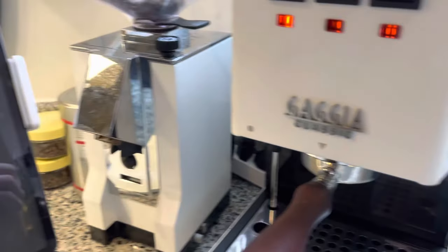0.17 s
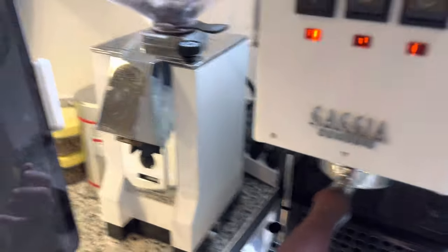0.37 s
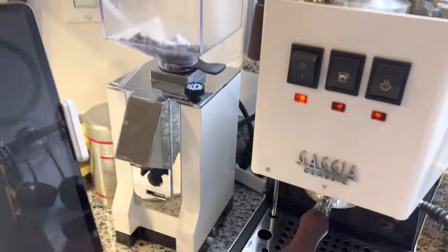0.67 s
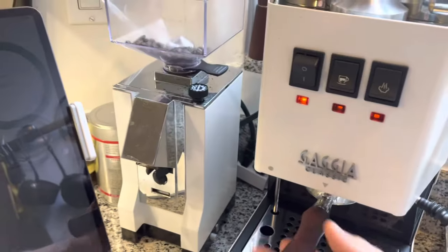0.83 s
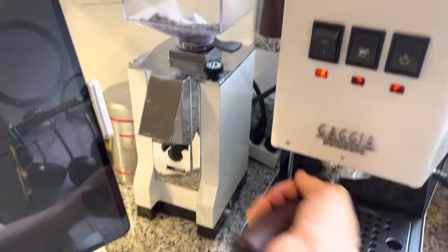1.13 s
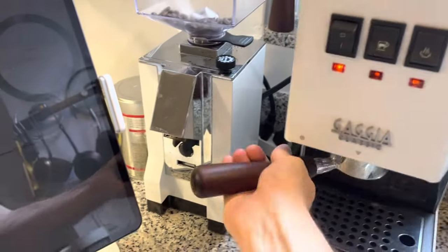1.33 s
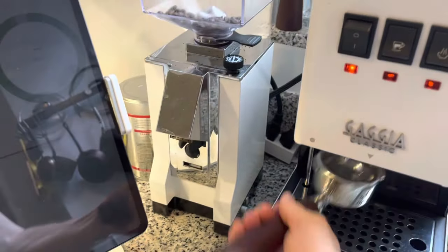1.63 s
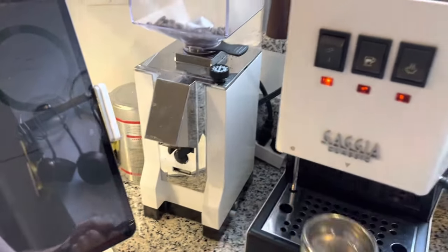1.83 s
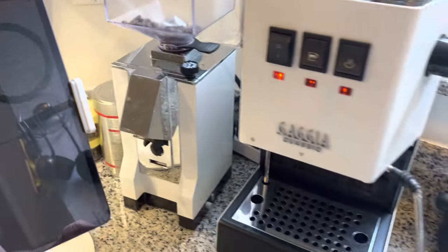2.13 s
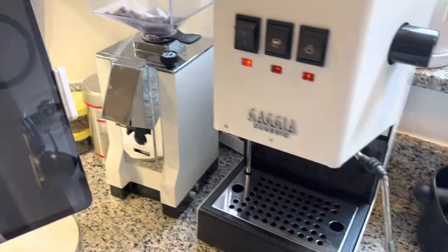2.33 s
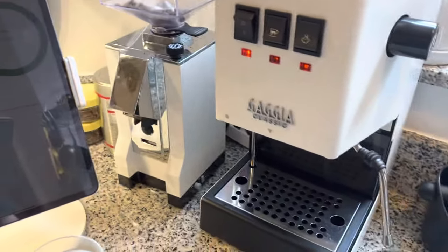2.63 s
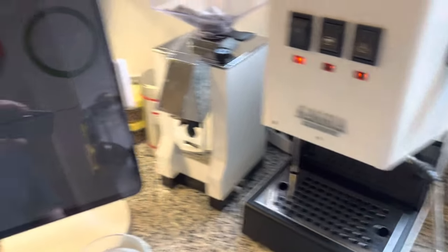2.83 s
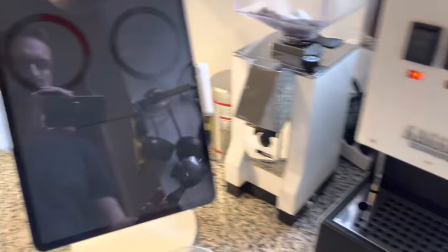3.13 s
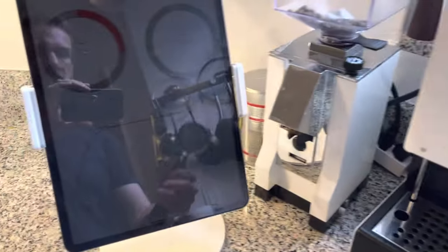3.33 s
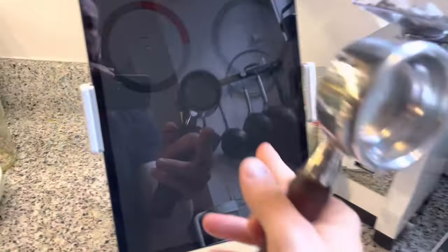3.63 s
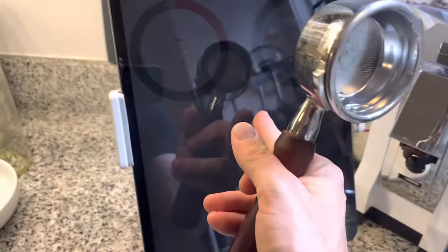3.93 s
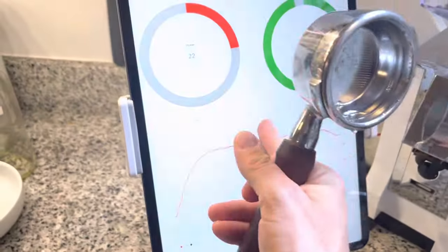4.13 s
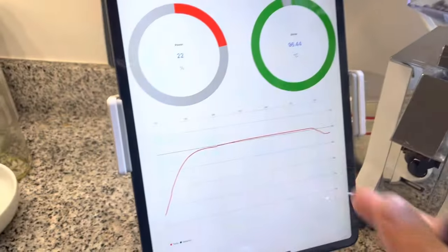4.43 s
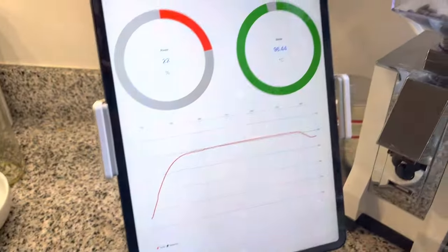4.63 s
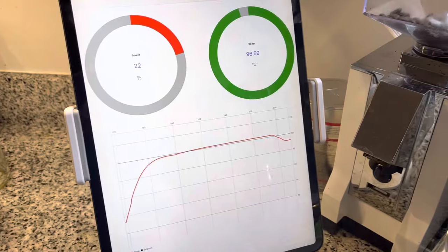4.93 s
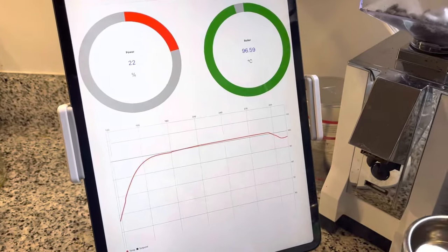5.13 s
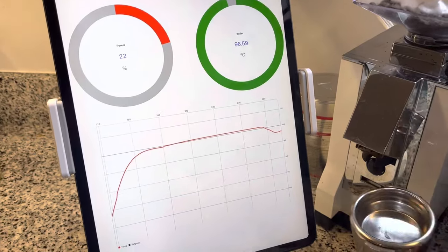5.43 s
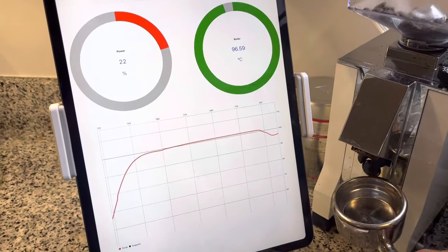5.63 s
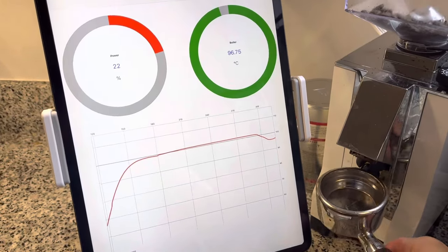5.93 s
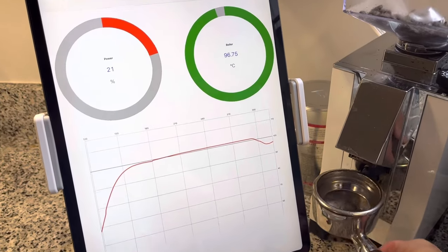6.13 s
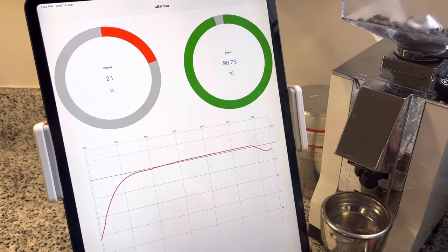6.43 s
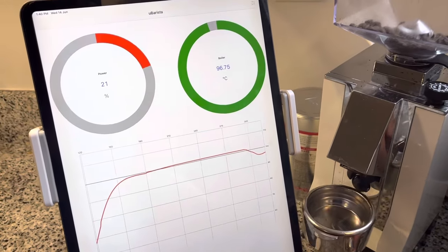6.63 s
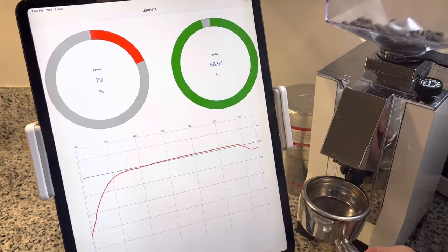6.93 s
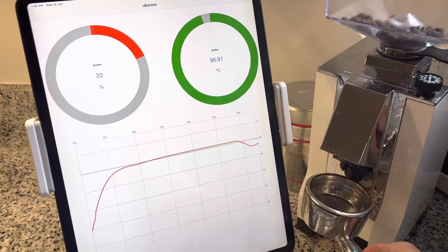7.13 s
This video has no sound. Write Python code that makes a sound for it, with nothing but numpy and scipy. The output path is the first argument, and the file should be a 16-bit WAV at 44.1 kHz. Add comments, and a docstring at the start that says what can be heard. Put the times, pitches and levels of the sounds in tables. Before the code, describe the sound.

Close handheld phone pickup in a small, slightly reverberant kitchen with a low hum. A metal filter holder twists out with a dry scrape, tiny squeaks and a burst of clunks. A cup knocks on the stone counter, faint metallic ticks and skin rubs follow, then the basket bangs into the grinder fork and rattles. A switch snaps and the grinder hums and crunches beans until the end.

```python
"""In a small kitchen, a steel portafilter is twisted out of an espresso machine and a cup is set on the counter.
Blows ring dense and clear modes of steel, counter and fork as the basket ticks, then clatters into a grinder.
Rubbing is coloured random clicks. A switch snaps, the motor hums in harmonics and the burrs crunch beans.
A phone with two ports, tapped by fingers, hears it over steady air noise and a low hum."""
import sys
import numpy as np
from scipy import signal
from scipy.fft import rfft, irfft
from scipy.io import wavfile
from scipy.ndimage import uniform_filter1d

SR = 44100
rng = np.random.default_rng(int(sys.argv[2]) if len(sys.argv) > 2 else 0)


def wrap_up_sound(samples):
    """Save the sound to the file named by the first command line argument, as 16-bit audio."""
    columns = np.atleast_2d(samples).T
    # keep every value between -1 and 1, then stretch to whole-number steps
    tamed = np.clip(columns, -1, 1)
    steps = np.round(tamed * 32767).astype(np.int16)
    wavfile.write(sys.argv[1], SR, steps)


N = 321489
TIME = np.arange(N) / SR  # s
BAND_HZ = 50 * 2 ** (np.arange(26) / 3)  # third-octave centres

# Blows. Brightness tilts the spectrum about 1 kHz; t60 is the decay time at 1 kHz.
# Lugs knock out of the group head. Each row: start in seconds, level in dB, brightness in dB per octave, t60 in s.
LUG_KNOCKS = [(1.317, -46, -3.5, 0.11), (1.327, -39, -6.5, 0.19), (1.3573, -26, 1, 0.068),
              (1.362, -27.5, -5.5, 0.074), (1.370, -26.5, -1.5, 0.091), (1.386, -31.5, 1, 0.06),
              (1.3955, -30.5, -0.5, 0.064), (1.404, -34.5, -1.5, 0.043)]
# The cup lands on the counter. Each row: start in seconds, level in dB, brightness in dB per octave, t60 in s.
COUNTER_KNOCKS = [(2.518, -40, 0, 0.22), (2.528, -30, -5.5, 0.23), (2.5625, -32.5, 2, 0.033),
                  (2.566, -33, 4.5, 0.066), (2.584, -37.5, -1.5, 0.35), (2.928, -42, -4, 0.18)]
# The rim grazes the grinder's spout. Each row: start in seconds, level in dB, brightness in dB per octave, t60 in s.
RIM_TOUCHES = [(5.9738, -36.5, -0.5, 0.063), (5.9875, -41.5, -0.5, 0.076)]
# The handle is bumped. Each row: start in seconds, level in dB, brightness in dB per octave, t60 in s.
HANDLE_BUMPS = [(1.636, -47, -14, .08), (5.8387, -42.5, 1, 0.06), (5.874, -42, -6, 0.11),
                (6.1211, -43.5, -8, 0.06)]
# The switch snaps. Each row: start in seconds, level in dB, brightness in dB per octave, t60 in s.
SWITCH_SNAPS = [(6.748, -29.5, 0.37, 0.046), (6.7535, -31.5, -0.55, 0.026)]
# Dull knocks of the basket against the fork, quiet to loud.
# Each row: start in seconds, level in dB, brightness in dB per octave.
FORK_KNOCKS = [(6.196, -44, 6.5), (6.2035, -31.5, 2.5), (6.207, -24.5, -3.5), (6.2605, -26, -1.5),
               (6.2705, -25.5, 4), (6.290, -15, -3.5)]
# The sticking rim jerks free. Each row: start in seconds, level in dB, brightness in dB per octave.
JERKS = [(1.089, -52, -2.5), (1.118, -57.5, 2), (1.149, -57, 0.5), (1.163, -52.5, -2.5), (1.249, -58, 4),
         (1.287, -53, -6)]
# Fingers tap the phone. Each row: start in seconds, level in dB, brightness in dB per octave.
PHONE_TAPS = [(.1116, -46.5, 2), (.1984, -50.5, 3.5), (.214, -48.5, 2), (.2245, -40, 3), (4.0532, -52.5, 8),
              (4.07, -55.5, 9.5)]
# The basket ticks in its holder; the one at 4.6046 s is a scuff on the phone.
# Each row: start in seconds, level in dB, brightness in dB per octave, favoured mode in Hz, ring in dB re the tick.
BASKET_TICKS = [(1.048, -64.5, 2, 4270, -10), (2.185, -64.5, -4.5, 2350, -7), (2.802, -68.5, -3, 2350, -1),
                (2.831, -69, -2.5, 2890, -1.5), (2.859, -69, -3.5, 2890, -5), (2.9243, -61, -4, 2890, -4),
                (2.986, -70, -3, 3215, 0), (3.0056, -65, -1, 2890, 1), (3.025, -70, -3, 2890, 0),
                (3.063, -72, -3, 2890, 0), (3.114, -63.5, -1.5, 3215, 2), (3.2838, -64.5, 1, 2350, 0),
                (3.367, -70, -5, 1850, -1), (3.544, -67, -3, 2350, -4), (3.573, -64, 2.5, 2350, -4),
                (3.6374, -58.5, 1, 2350, -1), (3.6767, -60, .5, 2350, -2.5), (4.4916, -66, 7.5, 2350, 11.5),
                (4.6046, -58.5, 6, 1850, 3), (4.628, -68, -3, 2890, 4), (4.7068, -66.5, -1.5, 1850, 3.5)]
# Beans crack and, brightest, clumps of grounds hit the chute.
# Each row: start in seconds, level in dB, brightness in dB per octave, favoured pitch in Hz.
BEAN_CRACKS = [(6.789, -42.5, 2.5, 2300), (6.801, -39, 2, 2150), (6.832, -38.5, 0.5, 2000),
               (6.844, -36.5, 1, 1430), (6.877, -42.5, 1, 2050), (6.899, -41.5, 1, 1460),
               (6.912, -45, 0, 2050), (6.934, -43.5, -1, 1450), (6.991, -35.5, -6, 2050),
               (6.999, -37.5, -3, 1400), (7.008, -43, -6, 2050), (7.046, -47, 5, 1440),
               (7.08, -46, -2, 1450), (7.162, -51, 7, 7000), (7.201, -48.5, 10, 7000),
               (7.223, -43.5, 4, 7000), (7.259, -51, 7, 7000)]

# Dense resonances of each struck body. Each row: frequency in Hz, relative level in dB per Hz.
GROUP_BODY = [(100, -32), (200, -23), (340, -8), (480, -5), (640, -3), (860, -20), (1800, -15), (2100, -21),
              (2420, -15), (2850, -28), (3400, -12), (4100, -24), (10000, -31), (16000, -44)]
COUNTER_BODY = [(35, -50), (60, -52), (115, 6), (193, -7.5), (227, -6), (268, -11.5), (480, -6), (732, -22),
                (1220, -18.5), (2900, -31.5), (5330, -30.5), (6580, -35), (16000, -36.5)]
BASKET_BODY = [(800, -15.5), (1800, 3), (2600, 2), (4000, -6), (8000, -12.5), (11000, -14), (16000, -17.5)]
RIM_BODY = [(200, -12), (350, -1.5), (620, -13), (900, -11.5), (1150, 1.5), (1700, -4.5), (2450, 2.5),
            (3300, -8.5), (4200, -6), (5500, -16), (7000, -28.5), (16000, -34)]
FORK_BODY = [(60, -26.5), (110, -8), (170, -30), (260, -1.5), (340, -0.5), (470, -0.5), (620, -31),
             (720, -7.5), (900, -18), (1100, -3), (1700, -9), (2300, -6.5), (5800, -22.5), (8000, -17),
             (11500, -29), (16000, -34)]
CHATTER_BODY = [(700, -30), (1100, -2), (1700, -0.5), (2500, -2.5), (3300, -9), (4500, -24), (16000, -50)]
HANDLE_BODY = [(80, -2), (250, -12), (420, 7.5), (650, -29), (1500, -14.5), (2200, -32.5), (5000, -48),
               (12000, -65)]
JERK_BODY = [(200, -14.5), (520, 4.5), (700, -8), (870, 0.5), (1100, -7), (1800, -6), (2800, -15.5),
             (5000, -15), (16000, -40)]
SWITCH_BODY = [(240, -43.5), (400, -30), (528, -35), (1110, -6), (2290, -9.5), (3310, -7), (3640, -20),
               (4240, -8), (6640, -18.5), (11600, -23.5), (12900, -59), (14600, -29), (16000, -27)]
BURR_BODY = [(500, -34), (1100, -18), (1400, 7.5), (1700, -14), (2050, 4), (2800, -12), (4400, -9.5),
             (7000, -21), (16000, -35)]
PHONE_BODY = [(60, 10), (400, 14.5), (1000, 8), (1600, 8), (2000, -9.5), (5000, -24), (10000, -43.5),
              (16000, -39)]

# Clear modes of each struck body. Each row: frequency in Hz, level in dB re the blow, t60 in s.
GROUP_MODES = [(335, -13, .17), (376, -6, .13), (454, -16, .12), (514, -8, .12), (621, -5.5, .12),
               (1373, -20, .18), (1838, -17, .12), (2380, -12, .12), (2425, -10.5, .13), (3170, -23, .14),
               (3215, -23, .28), (3400, -13, .08), (3500, -14, .09), (3610, -20, .1), (3740, -25, .18)]
COUNTER_MODES = [(119.7, -23, 0.067), (229.4, -7, 0.3), (361, -13.5, 0.5), (424, -17, 0.45),
                 (498, -3.5, 0.15)]
BASKET_MODES = [(1850, -1.5, .38), (1960, -6, .1), (2350, 1, .25), (2480, -5, .08), (2890, 0, .13),
                (3030, -6, .08), (3215, -2.5, .13), (4270, -4, .1), (5680, -10, .08)]
FORK_MODES = [(100, -22, .3), (246, -11.5, .17), (293, -16, .15), (345, -17, .14), (414, -15, .2),
              (455, -12, .08), (718, -16, .36), (1093, -10, .13), (1258, -11, .12), (1507, -25, .45),
              (1646, -15, .13), (1860, -19, .16), (2245, -17, .13), (2308, -17, .13), (2345, -17, .2),
              (2665, -25, .13), (2912, -26, .14), (3084, -22, .12), (3211, -24, .14), (3887, -29, .16),
              (7420, -35, .18), (8263, -37, .18)]
HANDLE_MODES = [(430, -3, .07), (2890, -15, .075), (4300, -15, .055)]
SWITCH_MODES = [(800, -15, 0.13), (1100, -0.5, 0.041), (1535, -11.5, .06), (4270, -6.5, 0.091),
                (4650, -17, 0.066)]

# Spectra of rubbed surfaces. Each row: frequency in Hz, relative level in dB per Hz.
GASKET = [(120, -44), (200, -7), (322, 1), (933, -17), (1270, -15.5), (2610, -25), (3690, -20.5),
          (5200, -23.5), (6500, -30.5), (10100, -37.5), (12400, -56.5), (16000, -37)]
SKIN = [(1000, -14.5), (2300, 6.5), (3500, -3.5), (5200, 1), (9000, -6.5), (16000, -5)]
PALM = [(3000, -25.5), (4600, 3), (5500, -5), (7000, -19), (16000, -28.5)]
# A lug squeaks. Each row: start in seconds, length in s, level in dB, pitch at mid-slip in Hz, roughness 0-1.
SQUEAKS = [(1.218, .056, -53.5, 3850, .09), (1.243, .028, -60, 2130, .05), (1.264, .044, -52.5, 3620, .055),
           (1.313, .036, -44, 3360, .035)]
# Fingers rub the handle, and it slides in the palm. Each row: start in seconds, length in s, level in dB.
RUBS = [(.82, 0.27, -74), (1.9, 0.57, -81), (2.92, 0.2, -77), (3.11, 0.29, -68), (3.48, 0.25, -76),
        (4.3, 0.52, -82.5), (4.6, 0.08, -67), (4.64, 0.38, -76)]
SLIDES = [(4.71, .11, -72), (4.87, 0.075, -75.5)]

# Motor lines of the mains and of the rotor's turn. Each row: multiple, mean level in dB.
MAINS_ORDERS = [(2, -57), (4, -57.5), (6, -59), (18, -58.5)]
ROTOR_ORDERS = [(2, -43.5), (5, -65), (8, -55), (10, -67), (12, -66), (14, -66), (16, -61), (19, -72),
                (21, -59), (22, -58), (23, -63), (24, -54), (25, -59), (34, -72), (35, -62)]
# Spectra of the grinder's housing, chute and grit. Each row: frequency in Hz, relative level in dB per Hz.
HOUSING = [(88, -50), (150, -8), (240, -4), (321, -8), (475, -1), (555, -19), (759, -15), (1420, -0.5),
           (1760, -12), (2020, -9.5), (2760, -20.5), (5460, -19), (6510, -31), (7320, -29), (16000, -46)]
CHUTE = [(3000, -5.5), (7200, -6), (10800, -8.5), (12500, -18), (15000, -13), (16500, -21)]
GRIT = [(700, -20), (1400, 0), (6000, -3), (12000, -14)]
# Humps on the housing's spectrum. Each row: frequency in Hz, width in Hz, lift in dB.
HOUSING_RINGS = [(1056, 24, 15.5), (1390, 170, 5), (1990, 130, 5.5), (3320, 200, 12.5), (4150, 480, 11),
                 (5520, 180, 15.5)]
# Pitches of coarse to fine grit, in Hz.
GRIT_HZ = 1700, 2200, 4600

# Spectrum of the kitchen air. Each row: frequency in Hz, relative level in dB per Hz.
KITCHEN = [(20, -38.5), (30, -17.5), (48, -2.5), (66, -1.5), (84, -5.5), (117, -2.5), (153, -14.5),
           (260, -13), (520, -27), (1200, -30), (1700, -34.5), (1950, -41.5), (5600, -53), (11000, -64),
           (16000, -82.5)]
# Appliance hum. Each row: frequency in Hz, mean level in dB.
HUM = [(59.5, -55), (105, -60.5), (120, -59.5)]
# Reverberation time. Each row: frequency in Hz, t60 in s.
ROOM_T60 = [(100, 0.31), (400, 0.5), (1500, 0.44), (4000, 0.55), (8000, 0.33), (15000, 0.33)]
# Colour of the room's tail. Each row: frequency in Hz, relative level in dB.
ROOM_COLOUR = [(100, -1.5), (500, -3.5), (3000, -6.5), (8000, -2.5), (11000, -3), (15000, -8.5)]
# Left port against right. Each row: frequency in Hz, level difference in dB.
PORT_BALANCE = [(60, -1.8), (400, -1), (700, -1.5), (1300, 1.5), (2400, 3.5), (4400, 6), (8000, 0),
                (15000, 0)]
# Lag of the right port; minus means the right port is ahead. Each row: frequency in Hz, phase in radians.
PORT_PHASE = [(60, 0), (1100, -.1), (1650, -.6), (2600, .2), (5200, 0), (6600, -3.1), (7600, -6),
              (10500, -6.5), (12500, -9.4), (13500, -9.6), (15000, -11.5)]
# Gain of the side signal. Each row: frequency in Hz, gain in dB.
PORT_SPREAD = [(60, -9), (250, -9), (700, -2), (2500, -3), (6000, -5), (12000, -7)]

FORK_T60_S, KNOCK_TOP_HZ = 0.057, 5260  # the dull knocks fall off steeply above this
DROP_S, DROP_DB, DROP_BRIGHT_DB, DROP_TOP_HZ = 6.2847, -12, 1, 14000  # brightness per octave
FIRST_HOP_S, RESTITUTION, REBOUND_DB = .0167, .7, -8.5
CHATTER_S, CHATTER_LENGTH_S, CHATTER_T60_S = 6.297, .038, 0.028
CHATTER_DB, CHATTER_FADE_DB = -23.5, -6.5
BASKET_T60_S, BASKET_FOCUS_DB_PER_OCT, BASKET_FOCUS_DB = 0.042, 35, 12
CRACK_T60_S, CRACK_FOCUS_DB_PER_OCT, CRACK_FOCUS_DB = 0.055, 13, 7.5
TAP_T60_S, JERK_T60_S = .028, 0.041
TWIST_S, TWIST_LENGTH_S, TWIST_DB, EASE_DB_PER_S = 1.046, 0.4, -53, -11
SQUEAK_SAG_HZ_PER_S = 2500
STROKE_RISE, STROKE_FALL = 0.28, .45  # shares of a stroke's length
START_S, MAINS_HZ, ROTOR_HZ = 6.755, 59.95, 59.35  # rotor: mean turns per second at full speed
CRUNCH_DB, SPRAY_DB = -51, -11  # spray: re the crunch
FRAGMENTS_DB, FRAGMENTS_S = -10, 0.041  # level re their crack, time constant
CAUGHT_DB, CAUGHT_S = -33, 0.035  # bits that lie between the burrs at the start
CRACKLE_LOW_HZ, CRACKLE_HIGH_HZ, CRACKLE_T60_S = 1250, 2300, .02
CRACKLE_DB, CRACKLE_SCATTER_DB = -37, 10  # strongest snap, and how far below it the weakest may lie
GRIT_DB, GRIT_WAVER_DB = -9, 4.5  # coarsest size, re the crunch
GRIT_WIDTH_HZ, GRIT_LIFT_DB = 600, 26
KITCHEN_DB = -53.5
TOP_HZ = 16100


def undb(db):
    """Decibels to amplitude gain."""
    return 10 ** (np.asarray(db) / 20)


def unit(x):
    """Scale to rms 1."""
    return x / np.sqrt(np.mean(x ** 2))


def read(points, hz):
    """Join points by straight lines over log frequency."""
    f, value = np.transpose(points)
    return np.interp(np.log(np.maximum(hz, 1)), np.log(f), value)


def colour(x, points, rings=()):
    """Linear filtering: impose a spectrum and resonant humps on a sound; rms 1."""
    hz = np.fft.rfftfreq(N, 1 / SR)
    db = read(points, hz)
    for f, width, lift in rings:
        db = db + lift / (1 + (2 * (hz - f) / width) ** 2)
    return unit(irfft(rfft(x) * undb(db), N))


def walk(rate):
    """Smooth random variation: chance values, rate per second, with a spread near 1."""
    k = int(SR / rate)
    steps = np.repeat(rng.standard_normal(N // k + 1), k)
    return uniform_filter1d(steps, k)[:N]


def grains(rate, spread_db):
    """Shot noise: random clicks, rate per second, most small and a few large."""
    happens = rng.random(N) < rate / SR
    size_db = spread_db * np.minimum(rng.exponential(size=N), 4)
    return happens * rng.standard_normal(N) * undb(size_db)


def wide_grains(rate, spread_db, points):
    """Two independent streams of coloured clicks, for mid and side."""
    return np.array([colour(grains(rate, spread_db), points) for _ in range(2)])


def spread(x, side):
    """Mid-side principle: the sum and difference of two signals give left and right."""
    return np.array([x[0] + side * x[1], x[0] - side * x[1]])


def dying_noise(gain, t60, size):
    """Modal crowding: noise of unit energy with a given spectrum, each third-octave dying at its own pace."""
    hz = np.fft.rfftfreq(size, 1 / SR) + 1
    overlap = np.maximum(1 - 3 * np.abs(np.log2(hz / BAND_HZ[:, None])), 0)
    shape = gain * np.sqrt(overlap)
    x = irfft(shape * rfft(rng.standard_normal((len(BAND_HZ), size))), size)
    x = x * np.exp(-np.log(1000) * np.arange(size) / SR / t60[:, None])
    # restore each band's share of the energy after its decay
    band_gain = np.linalg.norm(shape, axis=1) / np.linalg.norm(x, axis=1)
    return band_gain @ x / np.linalg.norm(shape)


def strike(blows, body, modes, ring_db, damping, side, scatter_db=2, size=16384):
    """Modal excitation: a blow sets off dense modes, shorter in the treble, and the body's clear modes."""
    out, t = np.zeros((2, N + size)), np.arange(size) / SR
    hz = np.fft.rfftfreq(size, 1 / SR) + 1
    spectrum = undb(read(body, hz))
    onset = 1 - np.exp(-t / 0.00045)
    for s, db, bright, t60, *soft_contact in blows:
        push = undb(bright * np.log2(np.maximum(hz, 60) / 1000))
        for corner_hz in soft_contact:
            push = push / np.sqrt(1 + (hz / corner_hz) ** 8)
        # tilt and softness leave the energy of the blow unchanged
        push = push * np.linalg.norm(spectrum) / np.linalg.norm(spectrum * push)
        decay = t60 * (BAND_HZ / 1000) ** -damping
        energy = np.sqrt(SR * t60 / np.log(1000))
        hit = energy * np.array([dying_noise(spectrum * push, decay, size) for _ in range(2)])
        for mode_hz, mode_db, ring in modes:
            # mode levels, pitches and phases differ at random from blow to blow
            level_db = mode_db + ring_db + scatter_db * rng.standard_normal()
            gain = undb(level_db) * np.interp(mode_hz, hz, push)
            shifted_hz = mode_hz * (1 + .002 * rng.standard_normal())
            phase = 2 * np.pi * (shifted_hz * t + rng.random((2, 1)))
            hit += gain * np.sin(phase) * np.exp(-np.log(1000) * t / ring)
        start = int(s * SR)
        out[:, start:start + size] += undb(db) * spread(hit, side) * onset
    return out[:, :N]


def alike(blows, *shared):
    """Give all blows the same decay and, if named, the same top frequency."""
    return [(*blow, *shared) for blow in blows]


def favour(rows, hz, db_per_oct, depth_db):
    """Selective excitation: resonances away from one pitch are weakened, down to a floor."""
    return [(f, db - min(db_per_oct * abs(np.log2(f / hz)), depth_db), *rest) for f, db, *rest in rows]


def strokes(rows, rise, fall):
    """Contact force of sliding: each stroke presses in, holds and lets go; rise and fall are shares of its length."""
    total = 0
    for s, length, db in rows:
        ramp = np.minimum((TIME - s) / rise, (s + length - TIME) / fall) / length
        total = total + undb(db) * np.clip(ramp, 0, 1)
    return total


def fading(start, db, lasts):
    """Exponential decay: a level jumps up and dies away."""
    return undb(db) * (TIME >= start) * np.exp(-np.maximum(TIME - start, 0) / lasts)


def lugs():
    """Impact of steel on steel: the lugs ring the group head."""
    return strike(LUG_KNOCKS, GROUP_BODY, GROUP_MODES, ring_db=1, damping=.12, side=.45, size=12288)


def cup():
    """Impact on a plate: the cup sounds the low modes of the counter."""
    return strike(COUNTER_KNOCKS, COUNTER_BODY, COUNTER_MODES, ring_db=1, damping=0.064, side=0.62)


def clinks():
    """Point excitation: each tick favours modes near one pitch, as a touch on a different spot does."""
    total = 0
    for s, db, bright, hz, ring in BASKET_TICKS:
        modes = favour(BASKET_MODES, hz, BASKET_FOCUS_DB_PER_OCT, BASKET_FOCUS_DB)
        total = total + strike([(s, db, bright, BASKET_T60_S)], BASKET_BODY, modes,
                               ring_db=ring, damping=.15, side=0.43, size=8192)
    return total


def bumps():
    """Impact on a damped body: the handle gives short knocks."""
    return strike(HANDLE_BUMPS, HANDLE_BODY, HANDLE_MODES, ring_db=0, damping=.2, side=.25, size=8192)


def drop(count=5):
    """Restitution: the basket lands hard and bounces, each hop shorter and weaker by the same share."""
    blows, s = [(DROP_S, DROP_DB, DROP_BRIGHT_DB)], DROP_S
    for k in range(count):
        s += FIRST_HOP_S * RESTITUTION ** k
        loss_db = 20 * np.log10(RESTITUTION ** (k + 1))
        blows.append((s, DROP_DB + REBOUND_DB + loss_db, DROP_BRIGHT_DB))
    return blows


def chatter(count=8):
    """Repeated weak impact: the loose basket chatters in its holder at uneven intervals, fading."""
    return [(CHATTER_S + (k + late) / count * CHATTER_LENGTH_S, CHATTER_DB + CHATTER_FADE_DB * k / count,
             0, CHATTER_T60_S) for k, late in enumerate(rng.random(count))]


def docking():
    """Contact stiffness: the rim grazes, dull knocks lose the treble that the drop into the fork keeps."""
    rim = strike(RIM_TOUCHES, RIM_BODY, BASKET_MODES, ring_db=-15.5, damping=.15, side=0.56, size=8192)
    blows = alike(FORK_KNOCKS, FORK_T60_S, KNOCK_TOP_HZ) + alike(drop(), FORK_T60_S, DROP_TOP_HZ)
    fork = strike(blows, FORK_BODY, FORK_MODES, ring_db=-1, damping=.3, side=.5)
    loose = strike(chatter(), CHATTER_BODY, [], ring_db=0, damping=.1, side=.5, size=2048)
    return rim + fork + loose


def twist():
    """Dry friction: the rim drags over its gasket, easing as it loosens, and sticks and jerks free."""
    drag = strokes([(TWIST_S, TWIST_LENGTH_S, TWIST_DB)], rise=.09, fall=0.046)
    drag = drag * undb(EASE_DB_PER_S * (TIME - TWIST_S))
    scrape = wide_grains(2500, 2.5, GASKET) * drag * undb(2.5 * walk(60))
    jerks = strike(alike(JERKS, JERK_T60_S), JERK_BODY, [], ring_db=0, damping=.2, side=.4, size=4096)
    return spread(scrape, .4) + jerks


def squeak(s, length, db, hz, rough):
    """Stick-slip oscillation: one slip of a lug is a hoarse tone that sags as it slows."""
    since_middle = np.clip(TIME - s - length / 2, -length, length)
    pitch = (hz - SQUEAK_SAG_HZ_PER_S * since_middle) * (1 + rough * walk(2000))
    return np.sin(2 * np.pi * np.cumsum(pitch) / SR) * strokes([(s, length, db)], STROKE_RISE, STROKE_FALL)


def squeaks():
    """Amplitude modulation: all slips share one fast random flutter."""
    return sum(squeak(*row) for row in SQUEAKS) * undb(1.28 * walk(400))


def fingers():
    """Asperity contact: skin sliding over the handle gives many tiny clicks."""
    rub = wide_grains(7000, 1.8, SKIN) * strokes(RUBS, STROKE_RISE, STROKE_FALL) * undb(1.5 * walk(40))
    slide = colour(grains(5000, 2), PALM) * strokes(SLIDES, STROKE_RISE, STROKE_FALL)
    return spread(rub, 1.0) + slide


def motor(speed, turn):
    """Harmonic series: stator lines sit on mains multiples, rotor lines climb with the speed of rotation."""
    stator = rotor = 0
    for k, db in MAINS_ORDERS:
        line = np.sin(2 * np.pi * (k * MAINS_HZ * TIME + rng.random()))
        stator = stator + undb(db + 0.43 * walk(12)) * line
    for k, db in ROTOR_ORDERS:
        line = np.sin(k * turn + 2 * np.pi * rng.random())
        rotor = rotor + undb(db + 3 * walk(45)) * line
    return stator + speed * rotor


def grit():
    """Band resonance: coarse and fine pieces come and go, each size rasping at its own pitch."""
    total = 0
    for hz in GRIT_HZ:
        rasp = colour(grains(600, 3), GRIT, [(hz, GRIT_WIDTH_HZ, GRIT_LIFT_DB)])
        total = total + rasp * undb(GRIT_DB + GRIT_WAVER_DB * walk(25)) * GRIT_HZ[0] / hz
    return total


def burrs(turn):
    """Fracture noise: bits break in a dense stream; each crack adds fragments until they are ground away."""
    # the gap between the burrs is uneven, so the crunch throbs with each turn
    throb = (1 + .22 * np.sin(turn) + .38 * np.sin(3 * turn)) * undb(1.5 * walk(45))
    fragments = sum(fading(s, db + FRAGMENTS_DB, FRAGMENTS_S) ** 2 for s, db, *_ in BEAN_CRACKS)
    caught = fading(START_S, CAUGHT_DB, CAUGHT_S) ** 2
    load = np.sqrt(undb(CRUNCH_DB) ** 2 + caught + fragments)
    crunch = np.array([colour(grains(2200, 2.6) * throb, HOUSING, HOUSING_RINGS) for _ in range(2)])
    spray = wide_grains(3000, 1.7, CHUTE) * undb(SPRAY_DB)  # grounds in the chute
    return (spread(crunch + spray, 0.85) + grit()) * load


def crackle(count=26, size=1024):
    """Damped oscillation: bean pieces snap at chance moments, each a brief ring at its own pitch."""
    out, t = np.zeros((2, N + size)), np.arange(size) / SR
    slot_s = (N / SR - START_S) / count
    for k, (late, pitch, softness, pan) in enumerate(rng.random((count, 4))):
        start = int((START_S + (k + late) * slot_s) * SR)
        hz = CRACKLE_LOW_HZ * (CRACKLE_HIGH_HZ / CRACKLE_LOW_HZ) ** pitch
        ring = np.sin(2 * np.pi * hz * t) * np.exp(-np.log(1000) * t / CRACKLE_T60_S)
        level = undb(CRACKLE_DB - CRACKLE_SCATTER_DB * softness)
        out[:, start:start + size] += level * spread([ring, ring], pan - .5)
    return out[:, :N]


def cracks():
    """Brittle fracture and impact: beans crack and, brightest, clumps hit the chute, each with its own colour."""
    total = 0
    for s, db, bright, hz in BEAN_CRACKS:
        body = favour(BURR_BODY, hz, CRACK_FOCUS_DB_PER_OCT, CRACK_FOCUS_DB)
        total = total + strike([(s, db, bright, CRACK_T60_S)], body, [],
                               ring_db=0, damping=0.075, side=0.32, size=4096)
    return total


def switch():
    """Snap action: two quick impacts ring the switch."""
    return strike(SWITCH_SNAPS, SWITCH_BODY, SWITCH_MODES, ring_db=3.0, damping=0.054, side=0.63)


def grinder():
    """Exponential run-up: at the start time power and rotor speed rise, and motor and burrs sound with them."""
    since = np.maximum(TIME - START_S, 0)
    power = 1 - np.exp(-since / 0.058)
    speed = 1 - np.exp(-since / .035)
    # the rotor's speed wanders slightly
    turn = 2 * np.pi * np.cumsum(ROTOR_HZ * speed * (1 + .004 * walk(40))) / SR
    return power * (motor(speed, turn) + burrs(turn) + crackle()) + cracks() + switch()


def taps():
    """Structure-borne sound: fingers knock on the phone itself, without the room."""
    return strike(alike(PHONE_TAPS, TAP_T60_S), PHONE_BODY, [], ring_db=0, damping=0.048, side=0.77, size=4096)


def background():
    """Stationary noise: gently drifting air noise and the wavering low hum of kitchen appliances."""
    drift_db = .8 * walk(3)
    air = np.array([colour(rng.standard_normal(N), KITCHEN) for _ in range(2)]) * undb(KITCHEN_DB + drift_db)
    hum = 0
    for hz, db in HUM:
        hum = hum + undb(db + 1.2 * walk(20)) * np.sin(2 * np.pi * hz * TIME + .5 * walk(8.0))
    return spread(air, 0.89) + hum


def room(x, wet_db, size=32768):
    """Reverberation: tiles and cupboards return a diffuse tail, different at each port."""
    build_up = 1 - np.exp(-np.arange(size) / SR / 0.0064)
    gain = undb(read(ROOM_COLOUR, np.fft.rfftfreq(size, 1 / SR)))
    tails = [dying_noise(gain, read(ROOM_T60, BAND_HZ), size) * build_up for _ in range(2)]
    mono = x.mean(axis=0)
    return x + undb(wet_db) * np.array([signal.fftconvolve(mono, tail)[:N] for tail in tails])


def scene():
    """Superposition: handling and grinder sound into the room; phone taps and background are added dry."""
    handling = lugs() + cup() + clinks() + bumps() + docking()
    friction = twist() + squeaks() + fingers()
    return room(handling + friction + grinder(), wet_db=-11.0) + taps() + background()


def record(dry):
    """Two-port reception: close ports differ in level and phase; high peaks are rounded and the top is cut."""
    hz = np.fft.rfftfreq(N, 1 / SR)
    left, right = rfft(dry)
    pair = spread([(left + right) / 2, (left - right) / 2], undb(read(PORT_SPREAD, hz)))
    balance, phase = read(PORT_BALANCE, hz), read(PORT_PHASE, hz)
    ports = np.array([undb(balance / 2), undb(-balance / 2) * np.exp(-1j * phase)])
    heard = irfft(pair * ports, N)
    rounded = heard / (1 + (heard / .88) ** 6) ** (1 / 6)
    return signal.sosfilt(signal.ellip(8, .2, 70, TOP_HZ, fs=SR, output="sos"), rounded)


dry = scene()
out = record(dry)
wrap_up_sound(out)
```